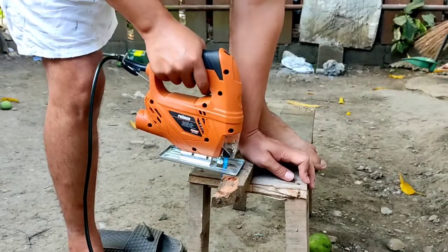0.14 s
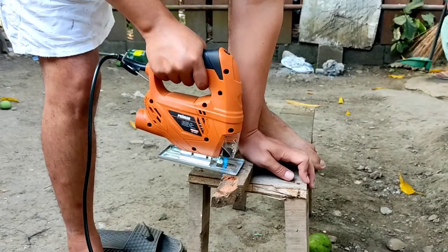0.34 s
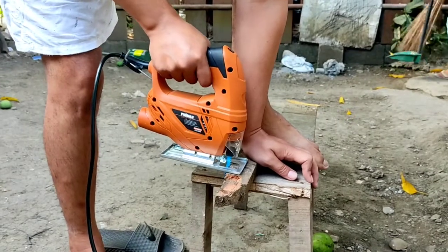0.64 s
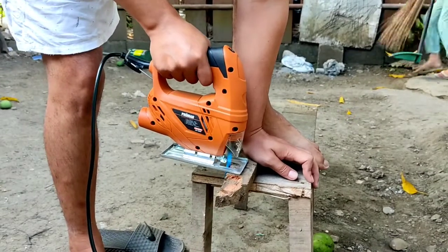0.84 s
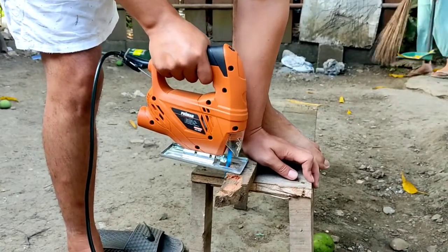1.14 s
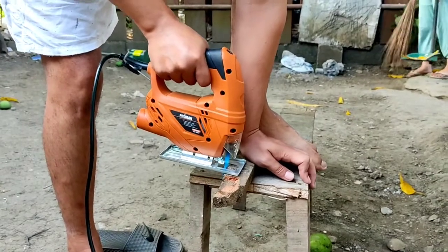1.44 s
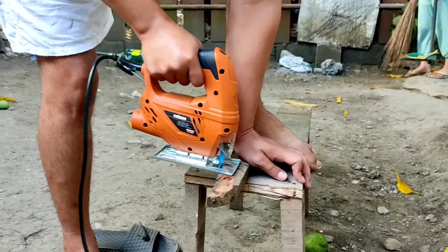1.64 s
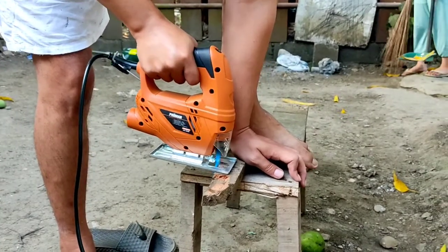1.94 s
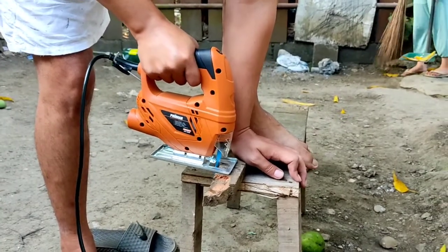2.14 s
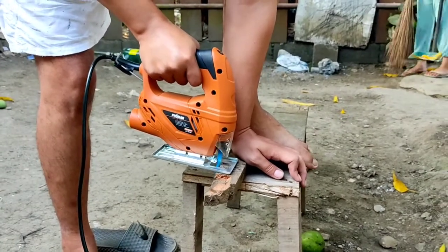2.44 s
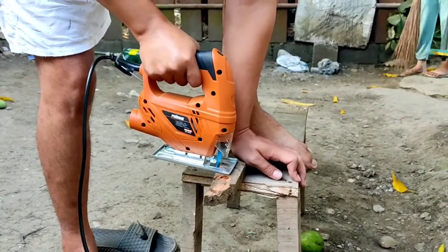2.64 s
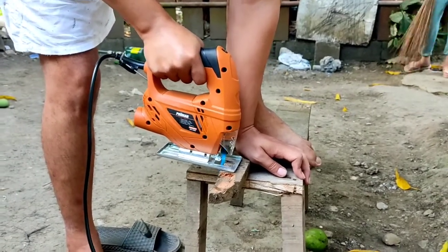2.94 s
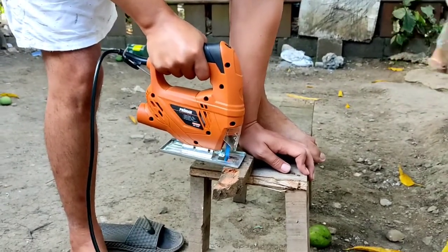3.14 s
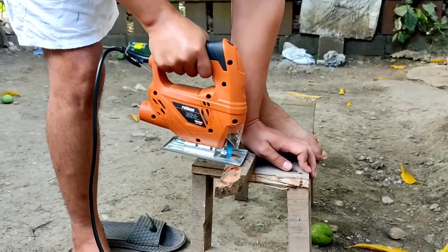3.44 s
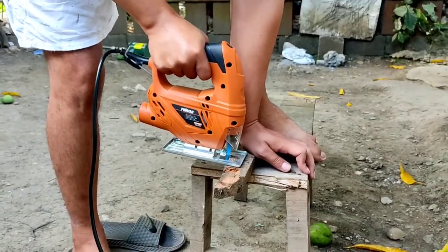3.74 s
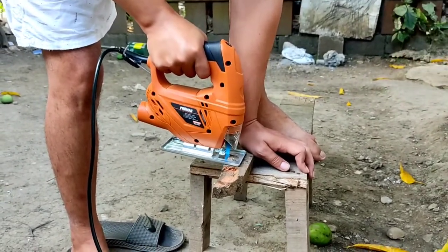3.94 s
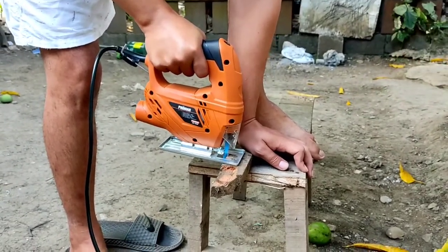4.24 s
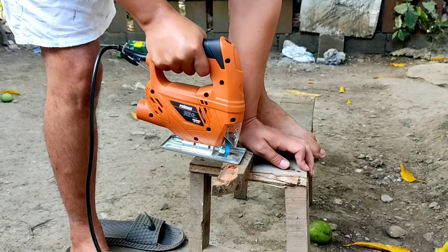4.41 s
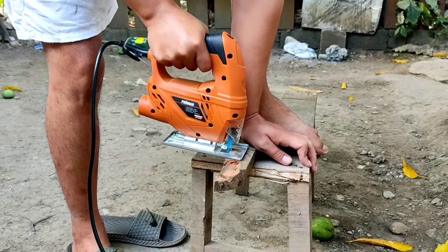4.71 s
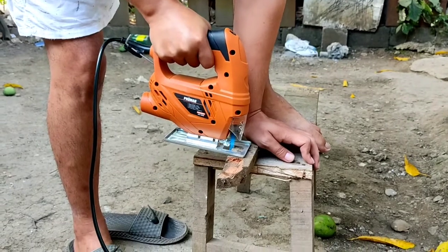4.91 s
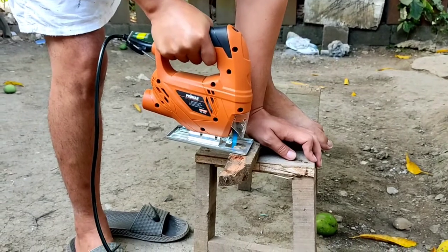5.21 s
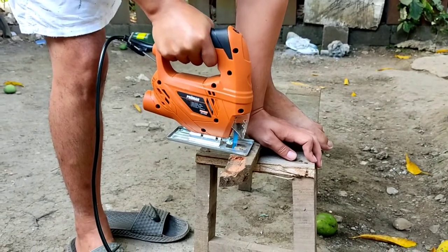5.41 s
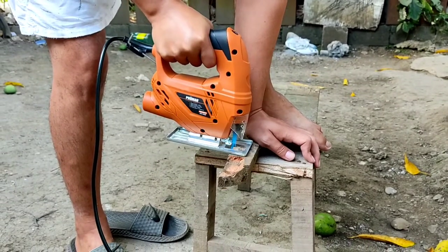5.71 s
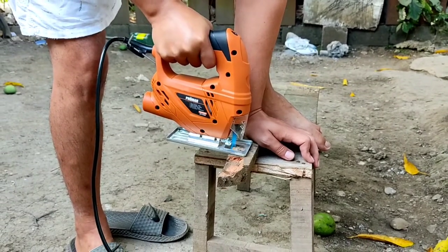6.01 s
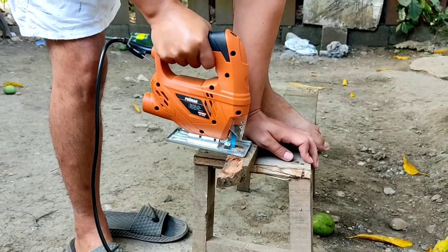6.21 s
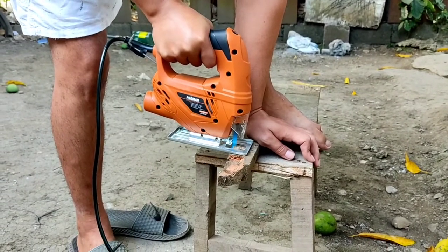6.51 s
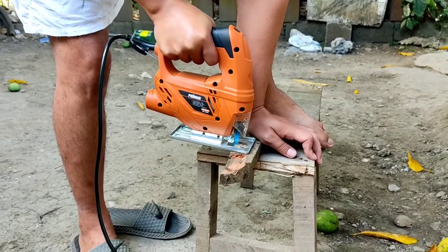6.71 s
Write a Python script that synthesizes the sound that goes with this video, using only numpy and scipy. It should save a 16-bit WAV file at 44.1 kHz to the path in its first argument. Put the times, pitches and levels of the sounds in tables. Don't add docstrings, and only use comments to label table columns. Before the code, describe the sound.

A quiet yard with faint far hum and a few soft handling taps for under a second, then an electric jigsaw switches on close to a phone microphone. Its pitch climbs quickly, then more slowly to a steady bright buzz: rapid blade knocks, singing gears, hissing fan and rattling wood. Cutting continues to the end, the pitch sagging slightly as the load deepens.

```python
import sys
import numpy as np
from scipy import signal
from scipy.fft import rfft, irfft, next_fast_len
from scipy.io import wavfile
from scipy.ndimage import uniform_filter1d

SR = 44100
rng = np.random.default_rng(int(sys.argv[2]) if len(sys.argv) > 2 else 0)


def magnitude_from_level(level_db):
    exponent = np.asarray(level_db, float) / 20
    return 10 ** exponent


def wrap_up_sound(samples):
    columns = np.atleast_2d(samples).T
    tamed = np.clip(columns, -1, 1)
    steps = np.round(tamed * 32767).astype(np.int16)
    wavfile.write(sys.argv[1], SR, steps)


N = 302526

# pitch_hz, level_db
YARD_COLOUR = [(60, -2), (160, -4), (240, 12.5), (350, 2.5), (740, -4), (1000, -8), (3800, -10.5),
               (6100, -18), (8000, -15.5), (15000, -16.5)]
# start_s, peak_db,
# pitch_hz, width_hz, fade_by_60_db_s
TAPS = [(0.192, -66, 130, 100, .1), (0.205, -56, 110, 120, .07), (0.359, -54, 1890, 900, .04),
        (.361, -55, 1300, 3500, 0.25), (0.514, -52, 210, 260, .06), (.359, -65, 500, 400, .05),
        (.371, -60, 1500, 2000, 0.18), (.53, -70, 4300, 150, .25), (.465, -67, 5200, 1200, .12),
        (.742, -75, 7000, 9000, 0.027), (.779, -64, 9000, 9000, 0.018), (.797, -50, 2200, 1800, .05),
        (0.815, -49.5, 454, 25, 0.53), (.838, -41, 2500, 4000, .08), (1.003, -31, 3000, 6000, .035),
        (1.067, -41, 3000, 6000, .04), (0.961, -51, 463, 39.8, 0.71)]
# time_s, level_db
BREEZE = [
    (0, -75.5),
    (1.6, -78),
    (2.5, -86),
    (3.6, -91),
    (4.8, -73),
    (6.86, -103),
]
# middle_s, length_s, level_db, left_minus_right_db
GUSTS = [(0.523, 0.03, -64, 25), (0.763, 0.1, -69, 17), (1.583, 0.075, -67, 22), (3.086, 0.18, -69, 4),
         (3.923, 0.21, -74, 8), (4.243, 0.24, -70, 0), (5.116, 0.082, -65, -1), (5.281, 0.2, -66, -18),
         (5.56, .25, -69, -2), (5.759, 0.14, -63, -10), (6.01, 0.078, -59, -8), (6.157, 0.13, -64, -13),
         (6.39, 0.22, -64, -12), (6.738, 0.37, -61, -15)]
# time_s, shaft_turns_per_s
SHAFT_SPEED = [(0.78, 329.63), (1.0, 348.25), (1.3, 384.28), (1.5, 402.11), (1.8, 408.4), (2.4, 416.09),
               (2.65, 419.71), (3.2, 416.88), (4.3, 416.86), (4.9, 409.34), (5.8, 401.68), (6.3, 402.89),
               (6.86, 402.01)]
# time_s, cut_depth_0_to_1, push_db
CUT = [(.8, 0.2, -1), (1.2, 0, 1.5), (1.27, 0, 5), (1.34, 0.1, -1), (1.5, 0, -0.5), (2.0, 0.18, -1.5),
       (2.6, 0.23, 1), (3.5, 0.39, 0), (4.3, 0.38, -1), (4.55, 0.56, -1), (5.0, 0.59, 1.5),
       (5.7, 0.65, -2.5), (6.86, 0.7, -1)]
TOOTH_FORCE = [
    (0, 0.0091),
    (.1, -0.066),
    (.25, -0.058),
    (.3, 0.93),
    (.5, 0.77),
    (.62, 0.58),
    (.72, 0),
    (.85, -0.5),
    (.95, -0.44),
    (1, -0.53),
]
# pitch_hz, level_db
BODY = [(120, -24), (200, -20), (480, -7), (640, -9.5), (800, -5.5), (1550, -8.5), (2020, 2), (2270, -5),
        (2690, 1), (3510, -1.5), (3900, -2.5), (5500, -9.5), (9000, -8.5), (15000, -19)]
# pitch_hz, width_hz, level_db
RINGS = [(465, 50, 7), (3560, 71, -5.5), (4280, 500, 3), (5590, 88, -1), (6230, 110, 1), (6470, 320, 0.5),
         (7030, 720, 4), (9000, 600, -2.5)]
# pitch_hz, bottom_db, top_db
KNOCK_COLOUR = [(280, 4.5, -13), (1250, -12, -2), (1750, 5, 2), (3000, 1.5, 3.5), (4640, -8.5, 0.5),
                (7000, -6.5, 0), (10400, -2.5, 2.5)]
SHAKE = [7, 8, 9, 10, 11, 12, 13, 14, 15, 16, 17, 19, 21, 23, 29, 31]
# shallow_cut_db, deep_cut_db
SHAKE_DB = [(-17, -11), (-13, -9), (-5.5, -5), (-2, -8), (6.5, -18), (1, -14), (-13, 6.5), (-17, -21),
            (-27, -14), (-23, -20), (-8.5, -4), (-13, -1.5), (-12, -13), (-19, -13), (-7, -10), (-12, -12)]
WHINE = [2, 2.582, 11.12, 11.566, 12, 12.434, 20.65, 24, 35]
# shallow_cut_db, deep_cut_db
WHINE_DB = [(-66, -62), (-59, -62), (-65, -59), (-58, -65), (-60, -61), (-62, -62), (-67, -74), (-56, -67),
            (-74, -70)]
# pitch_hz, left_db, right_db, likeness_0_to_1
PORTS = [(58, -4.5, -5, 0.92), (407, -1.5, -7, 0.8), (1240, 0.5, -1.5, 0.76), (1740, -1, -1, 0.86),
         (2165, -2, -4.5, 0.73), (2620, 0, 1, 0.67), (2860, -2, -1.5, 0.1), (4300, -3.5, -2.5, 0.1),
         (5480, 2.5, 2.5, 0.34), (6220, 4, 3, 0.67), (7280, -0.5, 0, 0.75), (8370, -2.5, 3, 0.28),
         (9140, 4, 1, 0.9), (9540, -6, 3.5, 0.5), (10000, -6, 7, 0), (10920, -10, 14, .1),
         (10930, -23, 12, .05), (11590, -27, 12, .05), (12800, -14, 4, .05), (13100, -20, -9, .05),
         (13540, -12, 0.5, .05), (14400, -10, -3.5, .05), (15000, -18, -3.5, 0.1)]
# pitch_hz, mid_or_left_db, side_or_right_db
GATE = [(1500, -19.5, -21), (3000, -6, -10), (4600, 1, -6), (5870, 1, -5), (7400, 3, -2), (9000, 2, -3),
        (10100, 0, 3), (10800, 4, -14), (11350, 2, -3), (13000, 3, 2), (13800, 4.5, 3), (15100, 6, 4.5)]
# time_s, pitch_hz, level_db
NULL = [(.9, 6000, 3), (1.1, 6000, -6), (1.55, 5950, -10), (1.8, 5800, 2), (2.2, 6100, -6),
        (2.5, 6000, -14), (2.7, 6000, -5), (3.0, 6350, -17), (3.25, 6000, -7), (4.0, 6050, -9),
        (4.7, 6000, -9), (5.3, 5700, -9), (5.8, 5850, -7), (6.1, 5800, -2), (6.5, 5500, -7),
        (6.86, 5600, 0)]

SIZE = next_fast_len(N + SR // 2, True)
HZ, T = np.fft.rfftfreq(SIZE, 1 / SR), np.arange(N) / SR


def evened(x):
    return x / np.sqrt(np.mean(x ** 2) + 1e-20)


def read(points, hz, order=1):
    columns = np.transpose(points)
    return np.interp(np.log(hz + 1), np.log(columns[0] + 1), columns[order])


def causal(db):
    cepstrum = irfft(np.log(magnitude_from_level(db)))
    half = len(cepstrum) // 2
    cepstrum[1:half] *= 2
    cepstrum[half + 1:] = 0
    return np.exp(rfft(cepstrum))


def drift(hz):
    smooth = signal.butter(2, hz, fs=SR, output="sos")
    return evened(signal.sosfilt(smooth, rng.standard_normal(N)))


def tones(multiples, levels_db, turns, depth, wobble_db):
    total = 0
    for multiple, (shallow_db, deep_db) in zip(multiples, levels_db):
        level = magnitude_from_level(shallow_db + (deep_db - shallow_db) * depth + wobble_db * drift(7.2))
        total = total + level * np.sqrt(2) * np.cos(2 * np.pi * (multiple * turns + rng.random()))
    return total


def ports(shared, other):
    left_lag = 3.55
    same = np.clip(read(PORTS, HZ, order=3), 0, 1)
    left = same * shared + np.sqrt(1 - same ** 2) * other
    left = left * np.exp(-2j * np.pi * HZ * left_lag / SR)
    pair = [left * magnitude_from_level(read(PORTS, HZ)), shared * magnitude_from_level(read(PORTS, HZ, order=2))]
    return irfft(np.array(pair), SIZE)[:, :N]


def far_noise():
    far = rfft(rng.standard_normal((3, N)), SIZE) * magnitude_from_level(read(YARD_COLOUR, HZ))
    noise = ports(far[0], far[1]) * [[1], [.6]] + ports(far[2], far[2]) * [[0], [.8]]
    return magnitude_from_level(-77.5) * noise / np.std(noise.mean(0))


def far_hum():
    hum = tones([225, 735], [(-85.5, -84.5), (-92, -107)], T, T / T[-1], 2.0)
    return hum * [[1.3], [.7]]


def short_sounds():
    taps, t = np.zeros((2, N)), np.arange(SR // 8) / SR
    f = np.fft.rfftfreq(len(t), 1 / SR)
    push = 1.3 * np.exp(-t / 0.00027)
    for start_s, db, hz, width_hz, fade_s in TAPS:
        puff = rfft((rng.standard_normal((2, len(t))) + push) * magnitude_from_level(-60 * t / fade_s))
        puff = irfft(puff * causal(-20 * np.log10(1 + ((f - hz) / width_hz * 2) ** 2)))
        taps[:, round(start_s * SR):][:, :puff.shape[1]] += magnitude_from_level(db) * puff / abs(puff).max()
    return ports(*rfft(taps, SIZE))


def wind():
    colour = magnitude_from_level(-15 * np.log10(1 + (HZ / 50) ** 2) + 6.4 * np.exp(-((HZ - 41) / 5.6) ** 2))
    colour = colour * np.clip(HZ / 25, 0, 1)
    side = np.array([[.5], [-.5]])
    pan_db = 14 - 22 * T / T[-1]
    power = magnitude_from_level(np.interp(T, *np.transpose(BREEZE)) + side * pan_db) ** 2
    for middle_s, length_s, db, gust_pan_db in GUSTS:
        power += magnitude_from_level(db + side * gust_pan_db) ** 2 * np.exp(-(2 * (T - middle_s) / length_s) ** 2)
    lumps = [rng.standard_normal(N) * magnitude_from_level(6.0 * drift(10.4)) for port in "LR"]
    rumble = [evened(irfft(rfft(x, SIZE) * colour, SIZE)[:N]) for x in lumps]
    return np.sqrt(power) * magnitude_from_level(-2.0) * rumble


def knocks(stroke, place, db, decay_s, repeat):
    hits = np.diff(np.floor(stroke - place), prepend=np.floor(stroke[0] - place))
    hits = hits * magnitude_from_level(db + 1.5 * drift(60))
    t = np.arange(2000) / SR
    fall = np.exp(-t / decay_s) * (1 - np.exp(-t / 0.00014)) * (1 + 0.4 * np.exp(-t / 0.00034))
    fresh = signal.oaconvolve(hits, fall)[:N] * rng.standard_normal((2, N))
    same = signal.oaconvolve(hits[None], fall * rng.standard_normal((2, len(t))), axes=1)[:, :N]
    return rfft(fresh + repeat * same, SIZE)


def blade_knocks(stroke, pace, depth):
    bottom_place, top_place = .245, .745
    bottom_db = 0 + 10.6 * (1 - pace) + 6.2 * depth
    top_db = 2.7 + 1 * (1 - pace) + 1.5 * depth
    click_db = -2.5 - 200 * np.maximum(pace - .78, 0)
    dull, sharp = (causal(read(KNOCK_COLOUR, HZ, order=column)) for column in (1, 2))
    blows = knocks(stroke, bottom_place, bottom_db, 0.0035, 0.4) * dull
    blows -= knocks(stroke, top_place, top_db, 0.0031, 0.32) * sharp
    blows += knocks(stroke, bottom_place, click_db, 0.0036, 0.54) * sharp
    return blows


def body_noise(drive, stool_db, board_db, fan_db, low, high):
    rings_db = sum(db * np.exp(-((HZ - hz) / width_hz) ** 2) for hz, width_hz, db in RINGS)
    drive = drive * causal(read(BODY, HZ) + rings_db)
    out = np.zeros((2, N))
    for share, db in ((1 - low, stool_db - 3.0), (low - high, board_db - 1.5), (high, fan_db - .3)):
        part = ports(*drive * share)
        out += magnitude_from_level(db) * part / np.std(part.mean(0))
    return out


def gear_song(shaft, stroke, pace, depth):
    gear_db = -34 + 20 * 4.4 * np.log10(pace) - 20.5 * np.exp(-depth / 0.44)
    force = np.interp(stroke % 1, *np.transpose(TOOTH_FORCE)) * magnitude_from_level(1.2 * drift(35.0))
    song = evened(force * np.cos(2 * np.pi * 5 * shaft)) * magnitude_from_level(gear_db)
    overtone = evened(force * np.cos(2 * np.pi * 15 * shaft)) * magnitude_from_level(gear_db - 19.0)
    return song + overtone


def stool_tones(stroke, pace, depth, stool_db, shaking):
    tone = shaking * magnitude_from_level(stool_db) * tones(SHAKE, SHAKE_DB, stroke, depth, 2.82)
    rattle = magnitude_from_level(stool_db - 8) * np.exp(-((pace - 0.817) / .12) ** 2)
    rattle_db = [(db, db) for db in (-6, -4, -3, -2, 0, 1, -3)]
    return tone + rattle * tones(SHAKE[1:8], rattle_db, stroke, depth, 3.0)


def motor_whines(shaft, pace, depth, fan_db, shaking):
    running = magnitude_from_level(fan_db - np.median(fan_db)) * np.clip((pace - .66) / .15, 0, 1)
    running = running * magnitude_from_level(22 * (1 - pace))
    low = shaking * tones(WHINE[:2], WHINE_DB[:2], shaft, depth, 3.0)
    high = tones(WHINE[2:], WHINE_DB[2:], shaft + .005 * drift(60), depth, 3.0)
    return running * (low + high)


def jigsaw():
    switch_s, spin_up_s = .78, .13
    at_s, *columns = np.transpose(CUT)
    depth, push = (np.interp(T, at_s, column) for column in columns)
    speed = np.interp(T, *np.transpose(SHAFT_SPEED))
    speed = speed * (1 - np.exp(-np.maximum(T - switch_s, 0) / spin_up_s))
    pace = np.maximum(speed / speed.max(), .02)
    shaft = np.cumsum(speed) / SR
    stroke = .0806 + 5 / 48 * shaft

    pace_db = 20 * np.log10(pace)
    fan_db = -42 + 1.42 * pace_db + 3 * depth + 0.05 * push
    board_db = -41 + 1 * pace_db + 1.5 * depth + 0.5 * push
    stool_db = -54 + 0.63 * pace_db + 1.5 * depth - 0.07 * push

    drive = rfft(rng.standard_normal((2, N)) * magnitude_from_level(1.0 * drift(23.5)), SIZE)
    drive += blade_knocks(stroke, pace, depth)
    low, high = (np.clip((HZ - hz) / 200 + .5, 0, 1) for hz in (1000, 3500))
    noise = body_noise(drive, stool_db, board_db, fan_db, low, high)

    shaking = pace ** 9.5
    lines = gear_song(shaft, stroke, pace, depth)
    lines += stool_tones(stroke, pace, depth, stool_db, shaking)
    lines += motor_whines(shaft, pace, depth, fan_db, shaking)
    gear_case = magnitude_from_level(4.5 * np.exp(-((HZ - 1920) / 160) ** 2))
    lines = rfft(lines, SIZE) * gear_case
    return (noise + ports(lines, -1j * lines * high)) * np.clip((T - switch_s) / 0.021, 0, 1)


def gate(x):
    lead, split_hz = 622, 9400
    padded = np.pad(x, ((0, 0), (lead, 0)))
    hz, t, z = signal.stft(padded, SR, window="cosine", nperseg=2048, noverlap=1024)

    def turn(z):
        mid_side = np.array([z[0] + z[1], z[0] - z[1]]) / np.sqrt(2)
        return np.where(hz[:, None] < split_hz, mid_side, z)

    def wide(p):
        return abs(uniform_filter1d(uniform_filter1d(p, size=40, axis=1), size=15, axis=2)) + 1e-28

    z = turn(z)
    at_s, *columns = np.transpose(NULL)
    null_hz, null_db = (np.interp(t - lead / SR, at_s, column) for column in columns)
    z[0] *= magnitude_from_level(null_db * np.exp(-((hz[:, None] - null_hz) / 410) ** 2))

    power = abs(z) ** 2 + 1e-30
    near = uniform_filter1d(power, size=32, axis=1)
    patches = uniform_filter1d(rng.standard_normal(z.shape), size=14, axis=1)
    sway_db = 3.6 * evened(uniform_filter1d(patches, size=2, axis=2))
    limit_db = np.array([read(GATE, hz), read(GATE, hz, order=2)])[..., None]
    limit = magnitude_from_level(limit_db + sway_db) ** 2
    total = power.sum((0, 1))
    limit = limit * np.clip(total / np.median(total) * 20, .05, 1)
    keep = np.where(power > limit * near, 1, magnitude_from_level(-45))
    z = z * keep * np.sqrt(np.minimum(wide(power) / wide(power * keep ** 2), 10))
    return signal.istft(turn(z), SR, window="cosine", nperseg=2048, noverlap=1024)[1][:, lead:lead + N]


def scene():
    yard = far_hum() + far_noise() + short_sounds()
    return yard + wind() + jigsaw()


def top_cut(x):
    return signal.sosfilt(signal.butter(12, 15150, fs=SR, output="sos"), x)


def record(dry):
    mix = gate(dry)
    return top_cut(mix)


dry = scene()
out = record(dry)
wrap_up_sound(out)
```